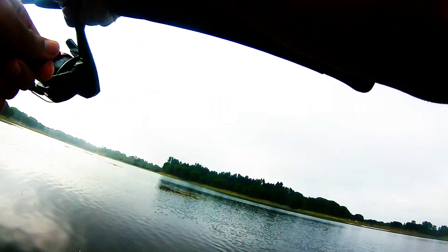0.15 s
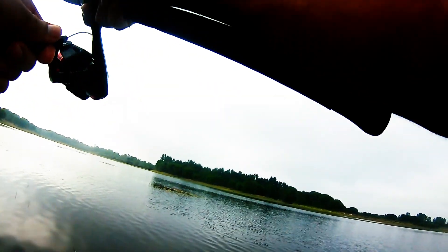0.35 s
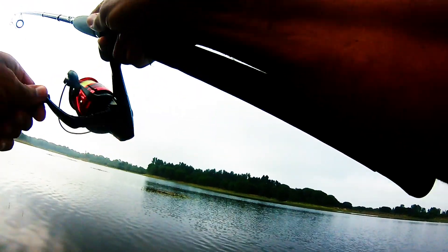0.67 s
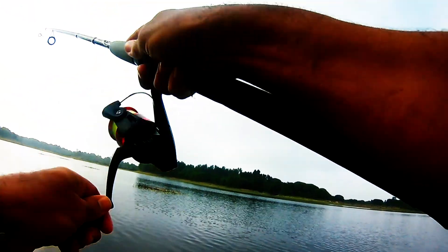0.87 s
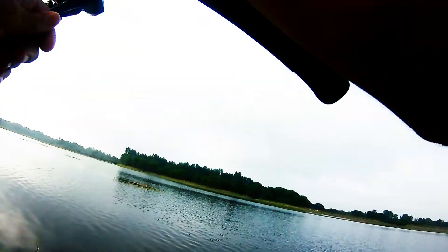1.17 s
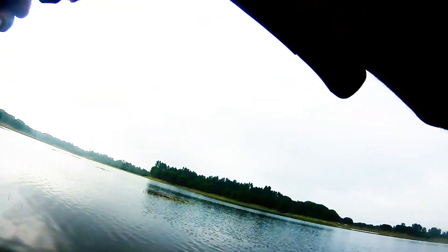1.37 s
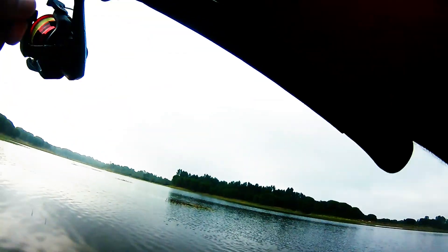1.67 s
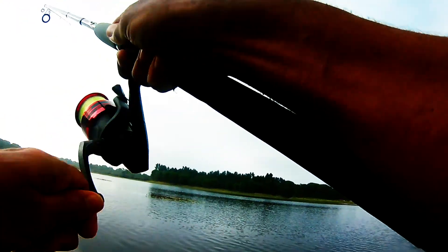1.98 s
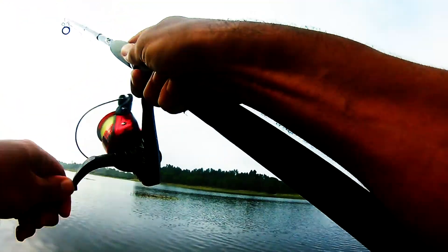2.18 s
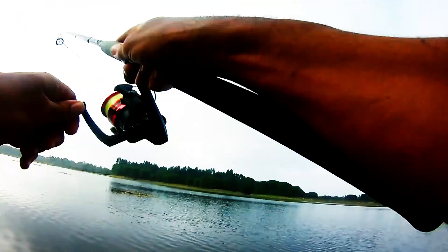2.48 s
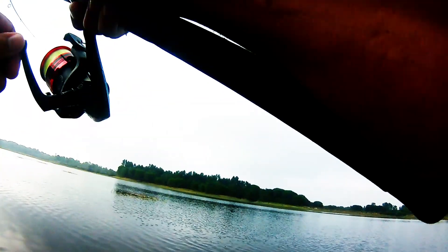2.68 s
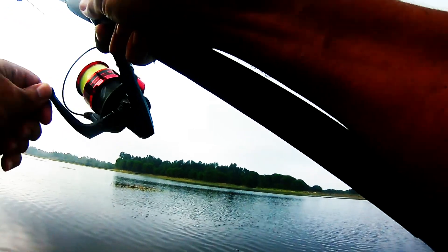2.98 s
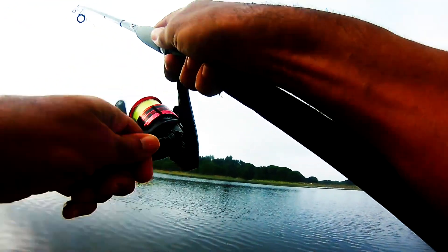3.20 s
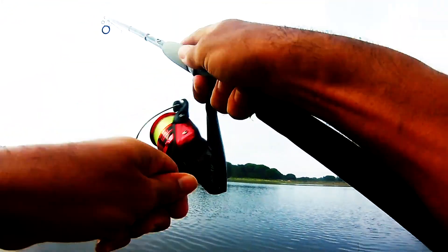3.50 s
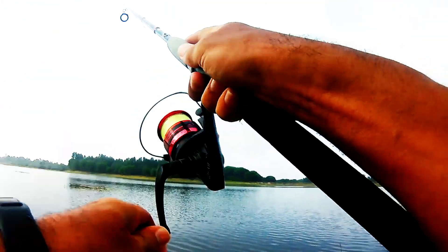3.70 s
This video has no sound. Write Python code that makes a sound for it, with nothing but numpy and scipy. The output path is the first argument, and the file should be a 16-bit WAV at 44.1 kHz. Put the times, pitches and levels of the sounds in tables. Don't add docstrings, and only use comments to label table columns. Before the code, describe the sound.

Close, boxy, muffled handling noise from a microphone inside a worn case: rustling drags, sharp slips, rising and falling squeaks, and a late loud knock, over low outdoor air rumble and faint hiss.

```python
import sys
import numpy as np
from scipy import signal
from scipy.io import wavfile
from scipy.ndimage import uniform_filter1d

SR = 44100
rng = np.random.default_rng(int(sys.argv[2]) if len(sys.argv) > 2 else 0)


def to_wav(sig):
    pcm = np.clip(np.atleast_2d(sig), -1, 1) * 32767
    pcm = np.round(pcm).astype(np.int16)
    wavfile.write(sys.argv[1], SR, pcm.T)


def level_to_linear(level):
    exponent = np.asarray(level, float) / 20
    return 10 ** exponent


N = 169785


def evened(x):
    return x / np.sqrt(np.mean(x ** 2) + 1e-20)


def add(mix, start_s, sound):
    part = mix[round(start_s * SR):][:len(sound)]
    part += sound[:len(part)]


def wobble(length, s):
    bell = np.hanning(2 * int(s * SR) + 3)[None]
    curves = signal.oaconvolve(rng.standard_normal((2, length)), bell, "same")
    return [evened(curve) for curve in curves]


def resonate(x, hz, width):
    pole = np.exp((2j * np.pi * hz - np.pi * width) / SR)
    return 2 * signal.lfilter([1 - abs(pole)], [1, -pole], x).real


# (frequency [Hz], width [Hz], level [dB])
CASE_MODES = [(221, 55, -5), (399.3, 66, 8.5), (446.5, 38.7, 10.5), (709, 76, 4.5), (805, 155, -2),
              (1123, 275, -16), (1393, 178, -10.5), (1937, 246, -15), (2460, 185, -18), (3360, 900, -35),
              (4420, 180, -25), (5250, 720, -40.5), (6430, 236, -74.5)]


def case(low, middle, high, top):
    out = 0
    for hz, width, db in CASE_MODES[:3]:
        out = out + level_to_linear(db) * resonate(resonate(low, hz, width), hz, 2 * width)
    for force, first, end in (middle, 3, 6), (high, 6, 9), (top, 9, 13):
        for k in range(first, end):
            hz, width, db = CASE_MODES[k]
            ring = resonate(resonate(force, hz, width), hz, 5.8 * width)
            out = out + (-1) ** k * level_to_linear(db) * ring
    return out


GRAINS_PER_S, GRAIN_SPREAD_DB = 900, 2
RUB_HISS, HIGH_HISS = 1.03, 2.5


def grit():
    spread = np.minimum(rng.exponential(1, N), 5)
    size = level_to_linear(GRAIN_SPREAD_DB * spread) * np.sign(rng.standard_normal(N))
    grains = evened(size * (rng.random(N) < GRAINS_PER_S / SR))
    hiss = rng.standard_normal(N)
    return evened(RUB_HISS * hiss + grains), evened(HIGH_HISS * hiss + grains)


DRAG_RISE_S, DRAG_FALL_S = 0.0048, 0.0038
RUB_TOP_DB = -3.5
# (time [s], rub level [dB], extra for middle [dB], extra for high resonances [dB])
STRAP_TENSION = [(0, -55, 4.5, 0), (.2, -71, -4, 0), (.3, -52, -2, -3.5), (.45, -56, -3.5, -0.5),
                 (.6, -55.5, 1.5, -2), (.9, -60.5, 1, 2.5), (1.0, -67, -6, 9), (1.12, -68, -6, 9),
                 (1.33, -57, -7, 0), (1.52, -75, -10, 9), (1.66, -57, 5, -0.5), (1.9, -57, 1, 2.5),
                 (2.45, -61.5, 0.5, 3.5), (2.9, -64.5, 5.5, 0.5), (3.15, -63.5, 3.5, 5), (3.3, -65, 3, 6.5),
                 (3.4, -57.5, 1, 3.5), (3.85, -57, 1.5, 2)]
# (start [s], length [s], level [dB], extra for middle [dB], extra for high resonances [dB])
STRAP_DRAGS = [(0.121, 0.028, -51, -5, -18), (0.162, 0.046, -50.5, -14, -13),
               (0.256, 0.045, -48, -5.5, -20.5), (0.372, 0.093, -48.5, -4.5, -26),
               (0.807, 0.088, -52.5, -7, -9), (1.146, 0.04, -46, 6.5, 4), (1.12, .006, -58, 8, 15),
               (1.194, 0.016, -44.5, 0.5, 3), (1.212, .018, -45, 0, 1.5), (1.247, 0.034, -41, -8, -7),
               (1.281, 0.012, -44, 2, -4), (1.299, .016, -40.5, -7, -7), (1.67, 0.04, -47, -2, -6),
               (1.71, .032, -43.5, -5, -8), (1.745, .03, -50, -5, -6), (2.493, 0.047, -52.5, 5, 0),
               (2.538, 0.036, -46.5, 5, -2.5), (2.578, 0.041, -49, -3, -4), (2.633, 0.018, -47, 5, 1),
               (2.651, .013, -39, -2, -12), (2.672, 0.013, -49, 0, -12), (2.707, 0.047, -46, -2.5, -15),
               (2.805, 0.033, -44, -1.5, -10.5), (2.846, 0.013, -45.5, -6.5, -9),
               (2.941, 0.079, -50, -7.5, -11), (3.069, 0.03, -51.5, -2, 1)]


def strap():
    t = np.arange(N) / SR
    force, fine = grit()
    s, db, middle_db, high_db = np.transpose(STRAP_TENSION)
    extra_db = np.array([0 * t, np.interp(t, s, middle_db), np.interp(t, s, high_db)])
    level = level_to_linear(np.interp(t, s, db) + extra_db)
    for start, length, db, middle_db, high_db in STRAP_DRAGS:
        rise = np.clip((t - start) / DRAG_RISE_S, 0, 1)
        fall = np.exp(-np.maximum(t - start - length, 0) / DRAG_FALL_S)
        drag = level_to_linear(db) * rise * fall
        level = np.hypot(level, drag * level_to_linear(np.array([[0], [middle_db], [high_db]])))
    low, middle, high = level
    rub = case(low * force, middle * force, high * fine, level_to_linear(RUB_TOP_DB) * high * fine)
    return rub / np.std(case(force, force, fine, fine))


SLIP_S, SLIP_ROUGH, LOW_LAG_S = 0.0049, 0.092, .0015
SLIP_EDGE, CONTACT_HZ = 0.49, 6000
SLIP_TRIM_DB = [-3, 0.5, 5, -1.5]
THUD_HZ, THUD_WIDTH_HZ, THUD_DB = 150, 120, -14
# (time [s], peak level [dB], middle [dB], high [dB], top resonances [dB])
STRAP_SLIPS = [(0.018, -47, -52, -57, -73), (0.038, -40, -56, -62, -78), (0.072, -42.5, -56, -54.5, -75),
               (0.12, -41, -48, -53.5, -68), (0.158, -42, -56, -58, -74), (0.258, -40, -45.5, -54, -74),
               (0.284, -38, -53, -55, -76), (0.304, -46, -56, -63, -74), (0.322, -46, -52, -59, -74),
               (0.338, -45, -44, -57.5, -72), (0.38, -50, -54, -58, -74), (0.398, -42, -57, -61, -76),
               (0.683, -39.5, -60, -69, -78), (1.133, -43, -31, -39.5, -61), (1.179, -43.5, -46, -52, -58),
               (1.191, -26, -36, -41.5, -43), (1.206, -50, -47, -45, -47), (1.246, -52, -46, -55, -64),
               (1.266, -50, -48, -58, -61), (1.575, -57, -61, -64, -70), (1.604, -40.5, -52, -56.5, -72),
               (1.632, -40.5, -46.5, -60, -62), (1.668, -50, -49, -56, -63), (1.687, -46, -49, -56, -66),
               (1.71, -43, -47, -54, -72), (1.796, -50, -49, -64, -72), (2.626, -31, -46, -45, -46),
               (2.641, -52, -52, -57, -57), (2.688, -48, -53, -58, -72), (2.734, -41, -51, -56.5, -68),
               (2.805, -50, -46.5, -57, -76), (2.843, -44, -50, -56, -74), (2.883, -55, -56, -62, -74),
               (2.895, -41, -48, -61, -75), (2.939, -54, -58, -59, -58), (2.952, -41, -52, -55, -66),
               (3.094, -48, -54, -52.5, -63), (3.366, -54, -52, -60, -70), (3.609, -60, -55, -49.5, -55.5),
               (3.701, -56, -50, -55.5, -59.5)]


def slips():
    out, t = np.zeros(N), np.arange(3000) / SR
    none = 0 * t
    dull = signal.butter(4, CONTACT_HZ, fs=SR)
    for s, *dbs in STRAP_SLIPS:
        jolt = (t == 0) + SLIP_ROUGH * rng.standard_normal(len(t)) * np.exp(-t / SLIP_S)
        edge = signal.lfilter(*dull, signal.lfilter([1, -SLIP_EDGE], [1], jolt))
        thud = resonate(resonate(jolt, THUD_HZ, THUD_WIDTH_HZ), THUD_HZ, THUD_WIDTH_HZ)
        add(out, s, level_to_linear(dbs[0] + THUD_DB) * thud / abs(thud).max())
        rings = (case(jolt, none, none, none), case(none, jolt, none, none),
                 case(none, none, edge, none), case(none, none, none, edge))
        for ring, db, trim_db, lag in zip(rings, dbs, SLIP_TRIM_DB, (LOW_LAG_S, 0, 0, 0)):
            add(out, s + lag, level_to_linear(db + trim_db) * ring / abs(ring).max())
    return out


WAVER, WAVER_S, FLUTTER_DB = .03, .002, 3.5
FUZZ_S, SMOOTH_HZ = .0009, 4000
OVERTONE_LEVELS = [-9.5, -14]


def squeak(hz, db):
    waver, flutter = wobble(len(hz), WAVER_S)
    fuzz_a, fuzz_b = wobble(len(hz), FUZZ_S)
    turn = np.exp(2j * np.pi * np.cumsum(hz * (1 + WAVER * waver)) / SR)
    tone = turn
    for k, overtone_db in enumerate(OVERTONE_LEVELS, 2):
        tone = tone + level_to_linear(overtone_db) * turn ** k * (k * hz < SR / 3)
    fuzz = (fuzz_a + 1j * fuzz_b) / (1 + (hz / SMOOTH_HZ) ** 2)
    return level_to_linear(db + FLUTTER_DB * flutter) * (tone * (1 + fuzz)).imag


BUCKLE_WIDTH_HZ, BETWEEN_DB = 360, -34.5
SAG_PER_S = 2.53
# (time [s], slip rate [Hz], level [dB])
STRAP_SQUEAKS = [
    [(1.705, 1710, -45), (1.72, 2070, -32), (1.74, 3470, -40), (1.75, 4300, -36), (1.764, 4500, -42),
     (1.778, 5510, -32), (1.805, 5940, -40), (1.84, 7000, -37)],
    [(2.39, 7440, -48), (2.435, 7020, -50), (2.468, 6460, -51), (2.482, 5850, -43), (2.49, 5300, -36),
     (2.497, 4300, -46), (2.503, 3490, -43), (2.51, 2840, -30.5), (2.524, 1300, -45)],
    [(2.945, 1340, -35), (2.958, 1990, -37.5), (2.968, 2830, -34), (2.98, 3560, -48), (2.994, 4580, -34.5),
     (2.999, 5200, -50), (3.005, 5950, -39), (3.025, 6400, -61), (3.072, 7440, -43)],
]
# (start [s], length [s], slip rate [Hz], level [dB])
STRAP_CHIRPS = [(0.775, 0.016, 6770, -37.5), (2.53, .025, 2850, -44), (2.555, 0.035, 2800, -41),
                (2.59, .03, 2850, -41), (1.705, 0.032, 4530, -46), (0.845, 0.015, 5300, -45),
                (1.918, 0.0066, 6750, -40), (1.952, 0.04, 6950, -37.5), (2.252, 0.015, 7300, -35.5),
                (2.268, 0.011, 7200, -38), (2.282, 0.014, 7250, -40), (2.311, 0.026, 7400, -41)]
# (frequency [Hz], level [dB])
BUCKLE_MODES = [(1950, -19.5), (2480, -23), (2880, -19), (3600, -18), (4420, -20), (5300, -28),
                (5800, -27.5), (6750, -39), (7300, -39), (11300, -53)]


def squeaks():
    out = np.zeros(N)
    for glide in STRAP_SQUEAKS:
        s, hz, db = np.transpose(glide)
        t = np.arange(s[0], s[-1], 1 / SR)
        sound = squeak(np.interp(t, s, hz), np.interp(t, s, db))
        add(out, s[0], sound * signal.windows.tukey(len(t), .1))
    for s, length, hz, db in STRAP_CHIRPS:
        arch = np.sin(np.pi * np.arange(0, length, 1 / SR) / length)
        sagging_hz = hz * (1 - SAG_PER_S * length * arch ** 2)
        add(out, s, squeak(sagging_hz, db) * np.sqrt(abs(arch)))
    rings = level_to_linear(BETWEEN_DB) * out
    for hz, db in BUCKLE_MODES:
        ring = resonate(resonate(out, hz, BUCKLE_WIDTH_HZ), hz, 2 * BUCKLE_WIDTH_HZ)
        rings = rings + level_to_linear(db) * ring
    return rings


KNOCK_S, KNOCK_DB, KNOCK_RISE_S = 3.5763, -11.5, 0.0015
DAMPED_S, DAMPED_T60 = 0.008, 0.011
FREE_DB = -16
RATTLE_DB, RATTLE_T60 = -39.5, 0.11
# (frequency [Hz], level [dB], time to fall by 60 dB [s])
KNOCK_MODES = [(300, -25, 0.043), (547, -13.5, 0.071), (726.6, 2, 0.073), (865, -7, 0.02),
               (1303, -8, 0.028), (1663, -14.5, 0.021), (2060, -16.5, 0.022), (2260, -5, 0.015),
               (3180, -23, 0.015), (4300, -24.5, 0.012), (5840, -63, 0.009)]


def knock():
    out, t = np.zeros(N), np.arange(6000) / SR
    ring = 0 * t
    for hz, db, t60 in KNOCK_MODES:
        side = np.sign(1900 - hz)
        ring += side * level_to_linear(db - 60 * t / t60) * np.sin(2 * np.pi * hz * t)
    rise = np.sin(np.pi / 2 * np.minimum(t / KNOCK_RISE_S, 1)) ** 2
    damped = level_to_linear(-60 * np.maximum(t - DAMPED_S, 0) / DAMPED_T60)
    ring *= rise * level_to_linear(KNOCK_DB) * (level_to_linear(FREE_DB) + damped)
    noise = rng.standard_normal(len(t))
    rattle = evened(case(noise, 2 * noise, 2 * noise, .5 * noise))
    add(out, KNOCK_S, ring + rattle * level_to_linear(RATTLE_DB - 60 * t / RATTLE_T60))
    return out


PING_T60, PING_TICK_DB = 0.05, -0.5
# (time [s], peak level [dB], frequency [Hz])
REEL_PINGS = [(1.048, -59, 1490), (1.3648, -58, 1430), (1.3957, -55.5, 1440), (1.4641, -54.5, 1430),
              (1.5748, -59, 1460), (2.0163, -54, 1526), (2.0303, -49.5, 1576), (2.253, -57, 1424),
              (3.0804, -53, 1545), (3.0942, -50.5, 1600)]


def pings():
    out, t = np.zeros(N), np.arange(3000) / SR
    none, tap = 0 * t, 1. * (t == 0)
    tick = case(none, tap, tap, none)
    tick = level_to_linear(PING_TICK_DB) * tick / abs(tick).max()
    for s, db, hz in REEL_PINGS:
        ring = level_to_linear(-60 * t / PING_T60) * np.sin(2 * np.pi * hz * t)
        add(out, s, level_to_linear(db) * (ring + tick))
    return out


AIR_DB, PATCH_DB = -56.5, 1
GUST_DB, GUST_TOP_HZ = 1.3, 300
BREEZE_S, BREEZE_DB, BREEZE_TOP_HZ = 3.5, 2.5, 200
# (frequency [Hz], level per Hz [dB])
LAKE_AIR = [(20, -8), (50, 2.5), (100, -2.5), (200, -8), (600, -9), (1500, -28), (3000, -30), (7000, -44)]


def air():
    frames, hz = N // 256 + 5, np.fft.rfftfreq(2048, 1 / SR)[:, None]
    a, b, patches = rng.standard_normal((frames, 1025, 3)).T
    patches = uniform_filter1d(uniform_filter1d(patches, size=20, axis=0), size=14, axis=1)
    gust = evened(uniform_filter1d(rng.standard_normal(frames), size=40))
    f, db = np.transpose(LAKE_AIR)
    level_db = np.interp(np.log(hz + 1), np.log(f), db, right=-80) + PATCH_DB * evened(patches)
    level_db = level_db + GUST_DB * gust / (1 + hz / GUST_TOP_HZ)
    breezy = np.arange(frames) * 256 / SR > BREEZE_S
    level_db = level_db + BREEZE_DB * (hz < BREEZE_TOP_HZ) * breezy
    z = (a + 1j * b) * level_to_linear(level_db)
    return level_to_linear(AIR_DB) * evened(signal.istft(z, nperseg=2048, noverlap=1792)[1][:N])


def scene():
    return (strap() + slips() + squeaks() + knock() + pings() + air())[None]


def roll_off(x):
    return signal.sosfilt(signal.butter(12, 14960, fs=SR, output="sos"), x)


HISS_DB, HISS_TILT, EDGE_HZ = -78, 0.033, 13950


def record(dry):
    hiss = signal.lfilter([1, HISS_TILT], [1], rng.standard_normal(dry.shape))
    band = signal.firwin(511, EDGE_HZ, window=("kaiser", 8), fs=SR)[None]
    mix = signal.oaconvolve(dry + level_to_linear(HISS_DB) * hiss, band, "same")
    return roll_off(mix)


dry = scene()
out = record(dry)
to_wav(out)
```